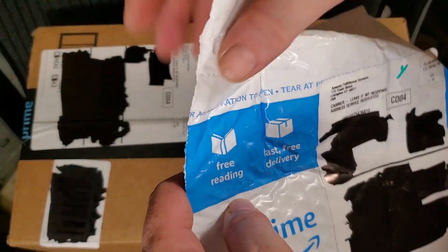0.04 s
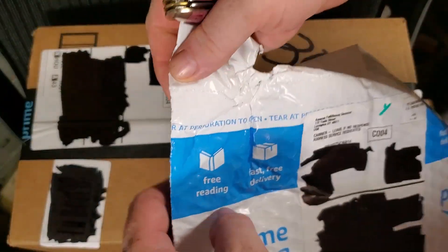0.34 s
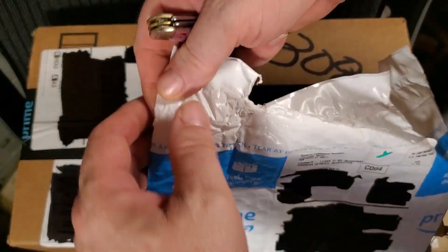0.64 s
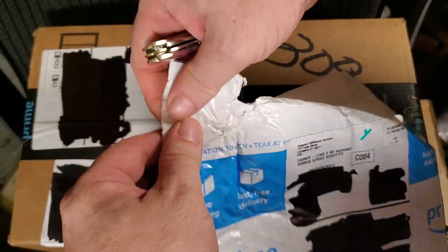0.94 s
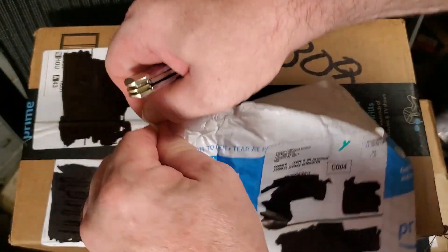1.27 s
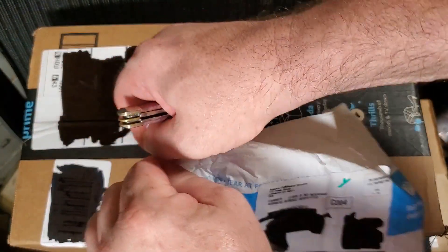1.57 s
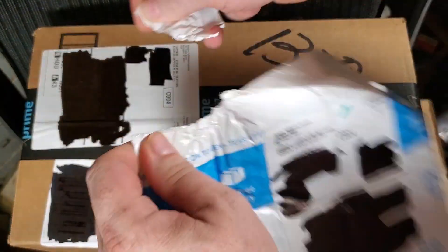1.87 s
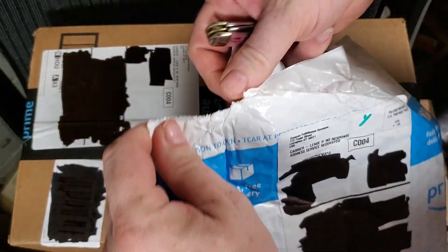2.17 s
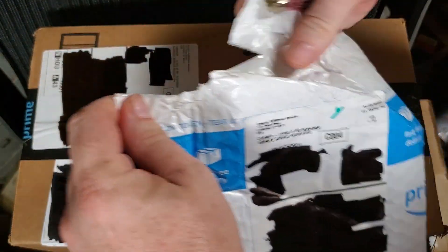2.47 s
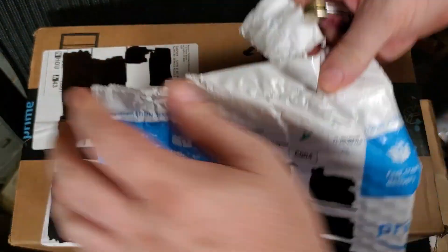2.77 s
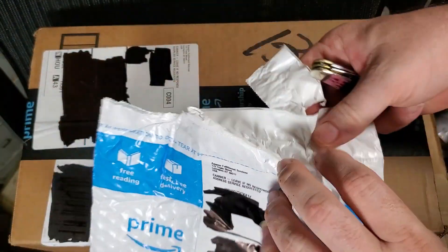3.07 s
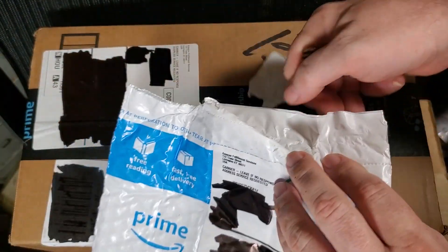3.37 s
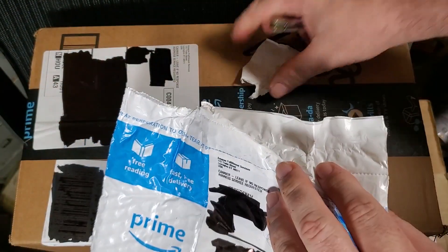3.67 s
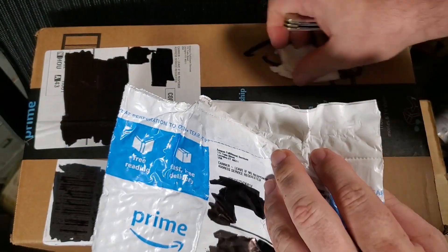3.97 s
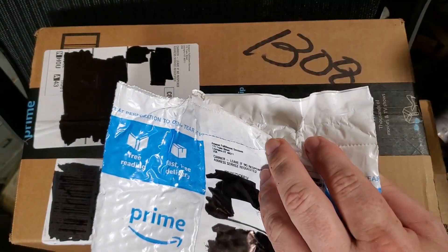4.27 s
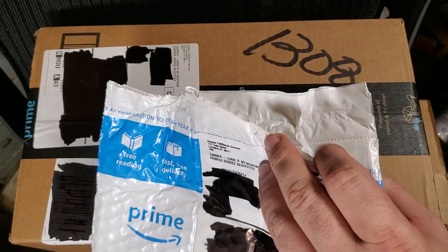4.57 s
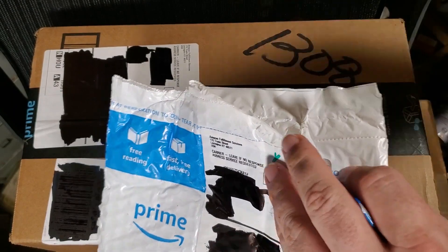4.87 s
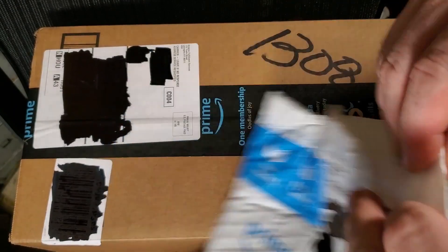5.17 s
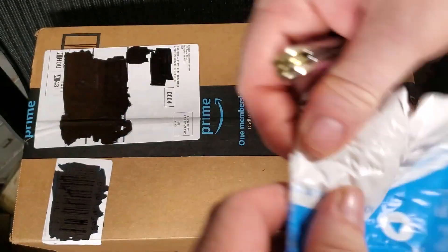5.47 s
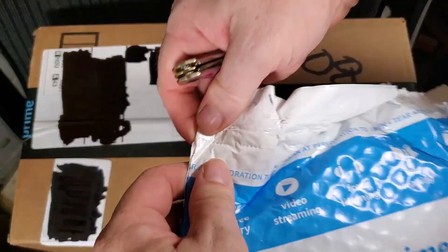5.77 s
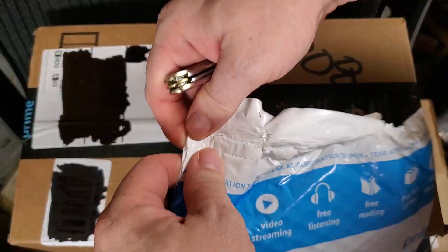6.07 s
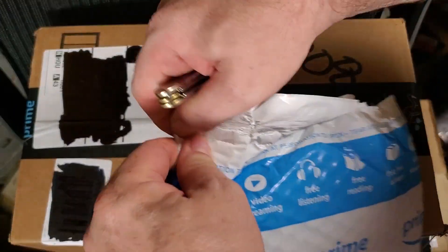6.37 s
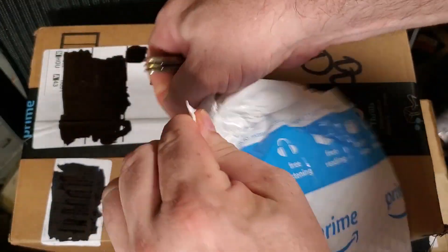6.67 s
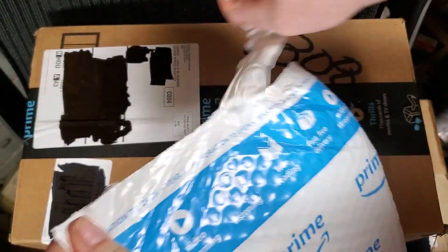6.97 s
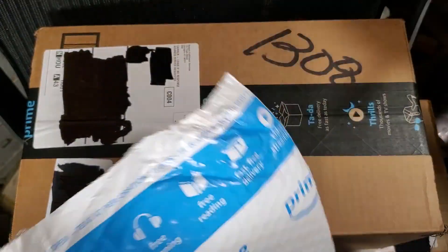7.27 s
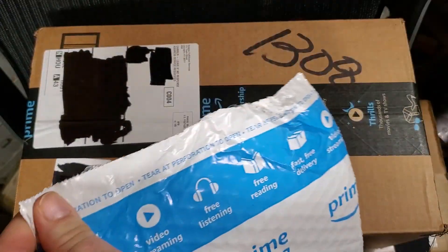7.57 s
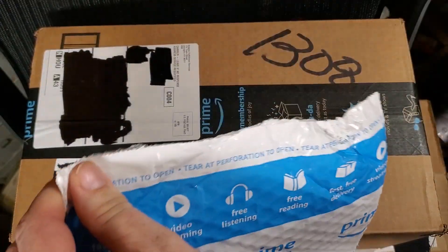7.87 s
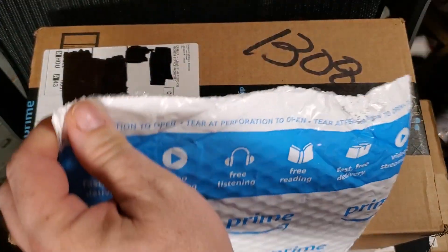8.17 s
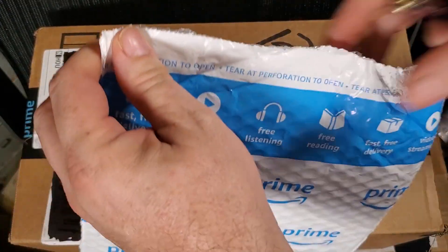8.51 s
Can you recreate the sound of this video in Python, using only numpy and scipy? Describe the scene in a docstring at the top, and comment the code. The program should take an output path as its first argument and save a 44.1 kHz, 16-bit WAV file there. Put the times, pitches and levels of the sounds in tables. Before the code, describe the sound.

Hands work a plastic bubble mailer, crinkling it with sharp little snaps, then rip the sealed strip with a loud pop. Lighter rustling follows, with soft taps and knocks on a cardboard box and a brief lull. The mailer scrapes across the box, crackles again and is torn in a quick run of loud, zipping rips before the rustle thins out. The microphone is very close, in a small, quiet room.

```python
"""Plastic film crinkles close to the microphone, a phone just above a cardboard box in a small room. Hands grip
a bubble mailer, rip its sealed strip once, lay it down, slide it round and tear twice more along the other
side. Creases snap over, the seal pops and zips, and the taut pouch drums under each rip. Hands and scraps knock
and tap on the box."""
import sys
import numpy as np
from scipy import signal
from scipy.fft import rfft, irfft, next_fast_len
from scipy.io import wavfile
from scipy.ndimage import uniform_filter1d

SR = 44100
rng = np.random.default_rng(int(sys.argv[2]) if len(sys.argv) > 2 else 0)


def generate_wav(sig):
    """Save sig (samples, or channels by samples) to the path in sys.argv[1] as 16-bit PCM at SR."""
    pcm = np.round(np.clip(np.atleast_2d(sig).T, -1, 1) * 32767).astype(np.int16)
    wavfile.write(sys.argv[1], SR, pcm)


N = 376613
BAND_LIMIT_HZ = 10700
GRIP_ATTACK_S, GRIP_FALL_DB_PER_S = 0.038, 183
SLACKEN_DB_PER_S = 311  # the pouch goes slack once a pull ends

# Levels in all tables are relative, ahead of each layer's gain.
# hands flexing the mailer: t/s, length/s, crinkle level/dB, padding level/dB
GRIPS = [(0, 0.08, -57, -45.5), (0.103, 0.76, -48.5, -46.5), (0.965, 0.42, -33.5, -42),
         (1.4, 0.5, -46.5, -55), (1.736, 0.03, -29, -34), (1.874, 0.25, -39.5, -49),
         (2.217, 0.34, -39, -48), (2.543, 0.31, -41, -49), (2.86, 0.62, -48.5, -72), (3.24, 0.29, -58, -60),
         (3.677, 0.18, -38, -37.5), (3.891, 0.17, -38, -43), (4.138, 0.12, -55, -60.5),
         (4.712, 0.18, -46, -46.5), (5.402, 0.12, -26.5, -31.5), (5.675, 0.11, -50, -43.5),
         (5.818, 0.46, -44, -46), (6.363, 0.094, -31, -37), (7.115, 0.35, -46.5, -48.5),
         (7.404, 0.53, -55, -80), (8.294, 0.22, -46.5, -49.5)]
# spectrum of crinkling film: f/Hz, level/dB
FILM_SPECTRUM = [(240, -21), (400, -15.5), (560, 9.5), (780, 2), (1040, -0.5), (1470, -6), (1950, -4.5),
                 (4950, -2.5), (6600, 0.5), (9410, -2.5), (10500, -32.5), (13600, -64.5), (22000, -120)]
# mailer or hand sliding on the box: t/s, length/s, level/dB, hollow f/Hz, full-speed scrape f/Hz
SLIDES = [(3.716, 0.032, -35, 1310, 2450), (3.912, 0.077, -49, 1320, 1520), (4.925, 0.17, -44, 1124, 1220),
          (5.054, 0.25, -28.5, 1280, 2200), (7.251, 0.13, -44, 870, 1920), (8.0, 0.19, -57.5, 1320, 2860),
          (8.21, 0.21, -58, 1360, 3100)]
# pulls that run the tear on: t/s, length/s, attack/s, tear fall/(dB/s), tear level/dB, drum level/dB,
# pushed air level/dB, throat level/dB, throat start f/Hz, throat end f/Hz
PULLS = [(1.61, 0.065, 0.008, 153, -17, -28, -34, -26.5, 380, 275),
         (6.587, 0.095, 0.024, 155, -16.5, -24, -48, -29.5, 330, 320),
         (6.716, 0.12, 0.0098, 189, -16, -28, -31.5, -23.5, 200, 460),
         (6.973, 0.069, 0.082, 293, -12.5, -19.5, -32, -23, 340, 518)]


def gain_of(db):
    """Decibels to amplitude."""
    return 10 ** (np.asarray(db) / 20)


def unit_rms(x):
    """Scales to rms 1."""
    return x / np.sqrt(np.mean(x ** 2) + 1e-20)


def steady(x, size=1500):
    """Evens out the power over about size samples and keeps the fine grain."""
    return x / np.sqrt(abs(uniform_filter1d(uniform_filter1d(x ** 2, size), size)) + 1e-9)


def smooth_noise(size):
    """Noise averaged over size samples, at rms 1."""
    return unit_rms(uniform_filter1d(rng.standard_normal(N), size))


def curve_at(points, hz):
    """Reads a table on a log-frequency axis."""
    f, value = np.transpose(points)
    return np.interp(np.log(hz + 1), np.log(f + 1), value)


def add(mix, s, sound):
    """Adds a sound into the mix at time s."""
    part = mix[max(round(s * SR), 0):][:len(sound)]
    part += sound[:len(part)]


def envelope(moves, attack_s, fall_db_per_s, swell_db=0):
    """Gain of movements (t/s, length/s, level/dB): each rises, holds or swells, then dies away."""
    gain, t = np.zeros(N), np.arange(int(1.5 * SR)) / SR
    for start, length, db in moves:
        held_db = db + swell_db * (np.minimum(t / length, 1) - .5)
        fallen_db = fall_db_per_s * np.maximum(t - length, 0)
        add(gain, start, np.minimum(t / attack_s, 1) * gain_of(held_db - fallen_db))
    return gain


def colour(x, spectrum, size=4096):
    """Minimum-phase filter of unit energy: clicks keep their sharp front."""
    log_gain = np.log(gain_of(curve_at(spectrum, abs(np.fft.fftfreq(size, 1 / SR))).clip(-100)))
    impulse = np.fft.ifft(np.exp(np.conj(signal.hilbert(log_gain)))).real[:size // 2]
    return signal.oaconvolve(x, impulse / np.linalg.norm(impulse))[:len(x)]


def resonate(x, hz, width_hz):
    """A resonance that can glide, at rms 1: twice shifts hz down to zero, smooths and shifts back."""
    turn = np.exp(2j * np.pi * np.cumsum(np.broadcast_to(hz, len(x))) / SR)
    pole = np.exp(-np.pi * width_hz / SR)
    for _ in range(2):
        x = 2 * (turn * signal.lfilter([1 - pole], [1, -pole], x / turn)).real
    return unit_rms(x)


def hump(x, hz, octaves):
    """The broad resonance of a patch of film."""
    f = np.fft.rfftfreq(len(x), 1 / SR)
    return irfft(rfft(x) * (f < BAND_LIMIT_HZ) / (1 + (np.log2((f + 1) / hz) / octaves) ** 2), len(x))


def crackle(per_s, spread_db):
    """Random clicks of either sign and uneven size."""
    size = gain_of(spread_db * np.minimum(rng.exponential(1, N), 2.47))
    return size * rng.choice([-1, 1], N) * (rng.random(N) < per_s / SR)


def facet(hz, decay_s, octaves, flap_db=-3, size=1024):
    """One facet of film flips: a brief flutter with a narrow resonance of its own; energy 1."""
    flutter = np.roll(rng.standard_normal(size) * np.exp(-np.arange(size) / SR / decay_s), 16)
    flap_hz = min(hz * 2 ** rng.uniform(-.8, .6), 9000)
    flip = hump(flutter, hz, octaves) + gain_of(flap_db) * hump(flutter, flap_hz, octaves=.22)
    return flip / np.linalg.norm(flip)


def facets(clicks, low_hz, high_hz, decay_s, octaves, count=32):
    """Every click flips one of many facets of different size."""
    shapes = [facet(hz, decay_s, octaves) for hz in np.geomspace(low_hz, high_hz, count)]
    out, which = np.zeros(N), rng.integers(0, count, N)
    for at in np.flatnonzero(clicks):
        add(out, at / SR, clicks[at] * shapes[which[at]])
    return out


def flexing():
    """How hard the fingers work the film."""
    return envelope([row[:3] for row in GRIPS], GRIP_ATTACK_S, GRIP_FALL_DB_PER_S)


def sliding():
    """How hard the mailer rubs on the box."""
    return envelope([row[:3] for row in SLIDES], attack_s=0.03, fall_db_per_s=144)


def room_tone(level_db=-48.5):
    """The small room's steady low rumble and faint hiss."""
    # spectrum of the quiet room: f/Hz, level/dB
    spectrum = [(12, -30), (20, -11.5), (49, -7), (70, -3.5), (87, -8), (129, -7), (147, -14.5),
                (290, -17.5), (322, -11), (376, -27), (619, -22.5), (706, -31.5), (7870, -50.5),
                (9710, -45.5), (10500, -77.5), (13600, -109), (22000, -120)]
    return gain_of(level_db) * unit_rms(colour(rng.standard_normal(N), spectrum))


def echoes(x, near_db=-5, near_t60=0.019, tail_db=-8):
    """Quick reflections from the nearby hands and box, then the short ring of the room."""
    # reverberation time of the room: f/Hz, t60/s
    room_t60 = [(100, 0.18), (500, 0.13), (2000, 0.09), (5000, 0.098), (10000, 0.14)]
    t = np.arange(SR // 2) / SR
    near, far = rng.choice([-1., 1.], (2, len(t))) * (rng.random((2, len(t))) < 3000 / SR)
    near *= gain_of(-60 * t / near_t60) * (t > .0012)
    hz, frame_s, bands = signal.stft(far * (t > .007), SR, nperseg=256)
    bands = bands * gain_of(-60 * frame_s / curve_at(room_t60, hz)[:, None])
    tail = signal.istft(bands, SR, nperseg=256)[1][:len(t)]
    impulse = gain_of(near_db) * near / np.linalg.norm(near)
    impulse += gain_of(tail_db) * tail / np.linalg.norm(tail)
    return signal.fftconvolve(x, impulse)[:N]


def room(x, turns_per_s=2.6):
    """Direct sound plus two crossfading patterns of reflections, as the mailer keeps moving."""
    angle = 2 * np.pi * turns_per_s * np.arange(N) / SR
    return x + echoes(x * np.cos(angle)) + echoes(x * np.sin(angle))


def side_echoes(x):
    """Reflections that differ between the phone's two microphones, mostly in the treble."""
    # gain of the reflections in the side channel: f/Hz, level/dB
    width = [(100, -60), (2700, -58), (4000, -30), (5500, -18), (7000, -10), (10000, -8)]
    size = next_fast_len(N)
    gain = gain_of(curve_at(width, np.fft.rfftfreq(size, 1 / SR)))
    return irfft(rfft(echoes(x), size) * gain, size)[:N]


def taps():
    """Fingertips tap the box as they put the scrap down; it answers with a short hollow thud."""
    # fingertip contacts: t/s, level/dB, contact/s (long is dull)
    touches = [(3.289, -24, 0.0056), (3.323, -27, .0018), (3.395, -22, 0.0011), (3.481, -24.5, .002)]
    # modes of the cardboard: f/Hz, level/dB, t60/s
    box_modes = [(112, -9, .06), (312, 0, .036), (450, -4, .022), (750, -8, .04), (1200, -9, .025)]
    out, t = np.zeros(N), np.arange(SR // 6) / SR
    box = sum(gain_of(db - 60 * t / t60) * np.sin(2 * np.pi * hz * t) for hz, db, t60 in box_modes)
    for s, db, contact in touches:
        thud = np.convolve(box, np.sin(np.pi * t[t < contact] / contact) ** 2)
        add(out, s, gain_of(db) * thud / abs(thud).max())
    return out


def knocks(knock_db=-3, bass_below_hz=140, rise_s=0.000076, scatter=0.048):
    """Hands and pouch bump the box, each time on another spot, so its damped modes vary a little."""
    # dull blows: t/s, level/dB, bass boost/dB, pitch ratio
    blows = [(0.14, -61, 26, 0.93), (0.228, -34, -5, 0.98), (1.342, -56, 23.5, 0.87), (1.613, -27, 1, 1.14),
             (1.659, -20, -0.5, 0.7), (1.717, -18.5, -7, 1.05), (1.777, -28, -6, 1.1),
             (1.918, -33, 0.5, 0.93), (2.487, -28.5, -16, 0.92), (2.575, -32.5, -4.5, 1.08),
             (2.754, -42, 5.5, 1), (3.715, -32.5, -3, 1.1), (3.75, -24.5, -9, 0.99), (3.821, -23.5, -8, 1),
             (4.08, -31, -13, 0.975), (5.963, -31, 3, 0.62), (6.393, -42, 2, 0.88), (6.759, -23, -14, 0.78),
             (7.036, -28, 4, 1.4), (7.104, -34.5, 7, 1.18), (8.461, -36, 6, 0.93)]
    # modes that a blow rings: f/Hz, level/dB, t60/s
    knock_modes = [(62.6, 4, 0.19), (95, 10.5, 0.084), (120, -4, 0.18), (164.5, -7, 0.041),
                   (213.3, -12, 0.093), (315, 5.5, 0.066), (452, -1.5, 0.072), (604, 3, 0.036),
                   (827, -7, 0.1), (1030, -1, 0.05)]
    out, t = np.zeros(N), np.arange(SR // 4) / SR
    hz, mode_db, t60 = np.transpose(knock_modes)[:, :, None]
    for s, db, bass_db, pitch in blows:
        detune, phase = rng.standard_normal((2, len(hz), 1))
        decay = gain_of(mode_db + bass_db * (hz < bass_below_hz) - 60 * t / t60)
        modes = decay * np.sin(2 * np.pi * (hz * pitch * (1 + scatter * detune) * t + phase))
        add(out, s, gain_of(db + knock_db) * modes.sum(0) * (1 - np.exp(-t / rise_s)))
    return out


def pouch(padding_db=-3, waft_db=-2, sliding_db=-15, waft_lead_s=0.032, waft_s=0.097):
    """The padding bumps softly when gripped or slid; the pouch wafts air as each pull jerks it free."""
    # spectrum of the bubble padding: f/Hz, level/dB
    padding_spectrum = [(29, -40.5), (50, 3), (123, -2), (175, -3.5), (326, -3), (367, -14.5), (420, -3),
                        (668, -13), (1200, -33), (1560, -41), (2640, -120)]
    air_spectrum = [(15, -27.0), (40, 14.0), (80, 3.5), (160, -18.5), (500, -77.0)]
    bumps = unit_rms(steady(colour(crackle(per_s=740, spread_db=0.5), padding_spectrum), size=3000))
    air = unit_rms(steady(colour(rng.standard_normal(N), air_spectrum)))
    grips = [(s, length, db) for s, length, _, db in GRIPS]
    handling = envelope(grips, GRIP_ATTACK_S, GRIP_FALL_DB_PER_S) + gain_of(sliding_db) * sliding()
    wafts = [(s + length - waft_lead_s, waft_s, db) for s, length, _, _, _, _, db, *_ in PULLS]
    swing = envelope(wafts, attack_s=0.013, fall_db_per_s=270)
    return gain_of(padding_db) * handling * bumps + gain_of(waft_db) * swing * air


def finger_drag(drag_db=-1):
    """Skin sticks and slips on the film and sets the air in the pouch booming."""
    # fingers taking hold: t/s, length/s, level/dB
    drags = [(5.49, 0.019, -29), (5.542, 0.028, -31.5), (5.618, 0.015, -36)]
    boom = resonate(crackle(per_s=680, spread_db=4.5), hz=205, width_hz=190)
    pressure = envelope(drags, attack_s=0.0085, fall_db_per_s=332)
    return gain_of(drag_db) * pressure * unit_rms(steady(boom, size=900))


def brief_rings():
    """A brief bright ring as the scrap is put down, probably a knife touching;
    hollow notes as the mailer is grasped or lifted."""
    # narrow resonances: t/s, length/s, level/dB, f/Hz, width/Hz
    rings = [(3.8, 0.018, -30, 4470, 500), (5.42, 0.014, -36, 474, 160), (8.138, .36, -65, 1380, 110)]
    out = np.zeros(N)
    for start, length, db, hz, width_hz in rings:
        note = resonate(rng.standard_normal(N), hz, width_hz)
        out += envelope([(start, length, db)], attack_s=0.01, fall_db_per_s=260) * note
    return out


def slides(grit_db=-3, hollow_db=-11, scrape_db=-5, catch_db=1.5, fastest_share=0.76):
    """Film catches and slips on cardboard: gritty hiss, a hollow note, a scrape that rises with speed."""
    # spectrum of film rubbing cardboard: f/Hz, level/dB
    hiss_spectrum = [(300, -12), (600, -11.5), (850, -10.5), (1100, -4), (1500, -6.5), (2400, -9),
                     (3200, -7.5), (4500, -9), (7000, -12), (9700, -19.5), (10300, -43)]
    grit = unit_rms(crackle(per_s=900, spread_db=3))
    rub = rng.standard_normal(N) + gain_of(grit_db) * grit
    rub *= gain_of(catch_db * smooth_noise(500))
    t = np.arange(N) / SR
    hollow_hz = np.interp(t, [s + length / 2 for s, length, *_ in SLIDES], [row[3] for row in SLIDES])
    scrape_hz = hollow_hz.copy()
    for s, length, _, rest_hz, top_hz in SLIDES:
        speed = np.sin(np.pi / 2 * np.clip((t - s) / (fastest_share * length), 0, 2))
        scrape_hz += (top_hz - rest_hz) * speed
    hollow = gain_of(hollow_db) * resonate(rub, hollow_hz, width_hz=480)
    scrape = gain_of(scrape_db) * resonate(rub, scrape_hz, width_hz=900)
    return sliding() * (unit_rms(colour(rub, hiss_spectrum)) + hollow + scrape)


def crinkle(crinkle_db=-1, hiss_db=-13, clump_db=3):
    """Small creases give way in clumps, over the hiss of skin and film rubbing."""
    clicks = crackle(per_s=900, spread_db=1.0)
    grains = facets(clicks, low_hz=1360, high_hz=8700, decay_s=0.0011, octaves=0.57, count=40)
    film = colour(steady(grains, size=3000) + gain_of(hiss_db) * rng.standard_normal(N), FILM_SPECTRUM)
    clumps = gain_of(clump_db * unit_rms(uniform_filter1d(smooth_noise(600), 200)))
    return gain_of(crinkle_db) * flexing() * unit_rms(film * clumps)


def scrunches(scrunch_db=-3):
    """A squeeze folds many creases at once: a brief swell of dense crackle."""
    # changes of grip: middle t/s, level/dB, half length/s, centre f/Hz
    squeezes = [(0.346, -33.5, 0.032, 3780), (0.797, -38, 0.15, 5000), (0.966, -37, 0.02, 6450),
                (1.235, -28.5, 0.066, 6500), (1.367, -35, 0.024, 5000), (1.546, -32.5, 0.05, 5400),
                (1.736, -19.5, 0.027, 4500), (2.534, -38, 0.056, 1800), (2.584, -34, 0.025, 4500),
                (2.788, -31.5, 0.018, 6000), (3.129, -37.5, 0.058, 4230), (3.284, -31.5, 0.084, 5460),
                (3.816, -20.5, 0.023, 4800), (4.065, -30, 0.081, 4190), (4.528, -52.5, 0.059, 4970),
                (4.811, -34.5, 0.041, 3980), (5.195, -22, 0.11, 5000), (5.394, -25.5, 0.041, 5200),
                (5.465, -19.5, 0.05, 4500), (5.707, -28.5, 0.088, 3700), (6.081, -26, 0.037, 5170),
                (6.417, -26.5, 0.01, 5000), (6.501, -27.5, 0.026, 4940), (6.99, -22, 0.053, 5560),
                (7.129, -27, 0.058, 5000), (7.63, -44.5, 0.076, 4800), (7.873, -40.5, 0.035, 5900)]
    clicks = crackle(per_s=1300, spread_db=6.0)
    grains = facets(clicks, low_hz=1470, high_hz=9150, decay_s=0.001, octaves=0.92)
    film = colour(steady(grains, size=700), FILM_SPECTRUM)
    out = np.zeros(N)
    for s, db, half_s, hz in squeezes:
        part = film[max(round((s - half_s) * SR), 0):round((s + half_s) * SR)]
        swell = unit_rms(hump(part, hz, octaves=2.76)) * np.hanning(len(part))
        add(out, s - half_s, gain_of(db + scrunch_db) * swell)
    return out


def small_creases(per_s=20, spread_db=0.5, centre_hz=3900, octaves=0.7, decay_s=0.0016, ring_db=-6):
    """Rows for snaps(): lesser creases go at random, louder the harder the film is flexed."""
    at = np.flatnonzero(rng.random(N) < per_s / SR)
    softness, pitch = rng.standard_normal((2, N))[:, at]
    levels_db = 20 * np.log10(flexing()[at] + 1e-9) - spread_db * softness
    pitches_hz = np.minimum(centre_hz * 2 ** (octaves * pitch), BAND_LIMIT_HZ)
    return [(s, db, hz, decay_s, hz, ring_db) for s, db, hz in zip(at / SR, levels_db, pitches_hz)]


def snaps(snap_db=14.5, ring_s=0.0011, avalanche_db=-8, avalanche_s=0.0068, avalanche_per_s=900):
    """A crease snaps over, rings its patch of film and sets off a short avalanche of smaller ones."""
    # large creases: t/s, level/dB, centre f/Hz, decay/s, ring f/Hz, ring level/dB against the crack
    large_creases = [(0.104, -29.5, 3460, 0.0023, 3300, -14), (0.144, -22.5, 6000, 0.0056, 5080, -15),
                     (0.221, -26, 4400, 0.0015, 5300, 4), (0.228, -21.5, 4450, 0.00095, 3350, -3),
                     (0.267, -22.5, 5360, 0.0011, 3270, -15), (0.311, -23.5, 4170, 0.0042, 3420, -9),
                     (0.403, -31, 6430, 0.0014, 9170, -7), (0.418, -27.5, 4500, 0.002, 4600, -4),
                     (0.486, -34, 5500, 0.0047, 9110, -8), (0.543, -26.5, 4870, 0.0031, 4800, 1),
                     (0.56, -26, 4270, 0.0016, 4070, -11), (0.674, -28.5, 5300, 0.0033, 5620, -14),
                     (0.788, -22, 3960, 0.0025, 3400, -9), (0.926, -26, 5400, 0.0015, 5960, 1),
                     (0.935, -20.5, 5360, 0.0023, 5350, 2), (0.951, -19, 5350, 0.0013, 3000, -8),
                     (0.992, -25, 6500, 0.0015, 7690, -7), (1.014, -19, 4370, 0.0009, 6260, -5),
                     (1.066, -20, 4500, 0.00097, 7400, -3), (1.086, -20, 4830, 0.0016, 4220, -9),
                     (1.094, -28, 4200, 0.0022, 5510, -5), (1.213, -20.5, 3380, 0.0046, 2970, 0),
                     (1.271, -17.5, 4800, 0.0004, 6760, -7), (1.315, -44, 5500, 0.0015, 2020, -2),
                     (1.351, -13.5, 3050, 0.002, 3000, -4.5), (1.411, -34, 5500, 0.0017, 6960, -7),
                     (1.444, -21.5, 3680, 0.003, 4480, -3), (1.505, -33, 5500, 0.0015, 4330, -6),
                     (1.518, -23.5, 4060, 0.0012, 3530, -9), (1.591, -28, 4500, 0.0017, 4350, -5),
                     (1.631, -5.5, 3770, 0.00067, 3500, -3), (1.65, -11, 4500, 0.0005, 2220, -12),
                     (1.864, -27, 4500, 0.0035, 3880, -7), (1.963, -34.5, 5130, 0.0033, 4410, -6),
                     (2.05, -26.5, 5000, 0.002, 3700, -9), (2.06, -25, 5200, 0.0017, 5900, -4),
                     (2.075, -28, 4100, 0.0027, 2900, 3), (2.106, -30, 3300, 0.0013, 2170, -8),
                     (2.144, -25.0, 3930, 0.003, 2840, -12), (2.204, -23.5, 5900, 0.0035, 6740, -1),
                     (2.363, -31, 5000, 0.00048, 4800, -2), (2.443, -28, 5000, 0.001, 5800, 0),
                     (2.488, -28, 2700, 0.0031, 2010, 1), (2.522, -21.0, 2620, 0.001, 2900, 9),
                     (2.568, -17.5, 4530, 0.0043, 7490, -6), (2.668, -38, 5000, 0.001, 5250, -6),
                     (2.686, -24.5, 5600, 0.0022, 5620, -4), (2.711, -23.5, 5770, 0.0028, 6740, -2),
                     (2.756, -19.5, 6550, 0.0022, 8300, -11), (2.819, -26.5, 5800, 0.0019, 6550, -3),
                     (2.838, -40, 4630, 0.0017, 3250, -9), (3.005, -29.5, 6800, 0.0029, 6150, 6),
                     (3.065, -28, 6250, 0.0055, 6270, -5), (3.104, -27.5, 3600, 0.002, 3080, -4),
                     (3.271, -20, 5200, 0.002, 3870, -5), (3.447, -25, 5560, 0.00053, 4780, -11),
                     (3.634, -29, 4960, 0.0017, 4100, -3), (3.707, -23.5, 2720, 0.0026, 2170, -12),
                     (3.754, -21.5, 5500, 0.0017, 6840, -3), (3.812, -26, 4500, 0.0032, 4230, -2),
                     (3.821, -7, 5000, 0.0016, 4430, 1.5), (4.061, -16.0, 3600, 0.0007, 3140, -13),
                     (4.066, -11.5, 4400, 0.0008, 3360, -2.5), (4.241, -32.5, 5800, 0.0017, 6640, -2.5),
                     (4.359, -38.0, 4670, 0.0014, 4630, -2.5), (5.485, -21.5, 6080, 0.0015, 4930, -9),
                     (5.516, -18, 3800, 0.0023, 4800, 4), (5.533, -15.5, 4000, 0.0015, 4300, -6),
                     (5.548, -17.0, 3050, 0.0037, 3020, -8), (5.576, -13, 5260, 0.00093, 6460, -2),
                     (5.621, -20, 3460, 0.0008, 2450, 1), (5.647, -18.5, 4950, 0.0012, 3950, -12),
                     (5.669, -15.5, 3180, 0.00043, 3800, -10), (5.678, -20.5, 4070, 0.0022, 5100, -11),
                     (5.693, -20, 3480, 0.00079, 3880, -14), (5.723, -15, 3720, 0.0016, 2760, -2.5),
                     (5.783, -23, 3400, 0.00084, 1670, -7), (5.819, -31, 3500, 0.0009, 3960, 5),
                     (5.868, -21.5, 6800, 0.0009, 6350, 1), (5.929, -27, 3400, 0.0024, 3440, 3),
                     (5.965, -29, 1860, 0.0011, 4200, -8), (5.994, -18, 3600, 0.0017, 3510, -7),
                     (6.01, -34, 5000, 0.0007, 5680, -5), (6.035, -17, 7000, 0.0025, 2230, -7),
                     (6.061, -13, 6200, 0.0016, 7690, -5), (6.079, -25, 4300, 0.00088, 2000, 2),
                     (6.137, -26, 6500, 0.0022, 2050, -7), (6.159, -20.5, 6530, 0.0003, 5580, -4),
                     (6.334, -21.5, 5600, 0.0036, 4540, -12), (6.354, -31, 6000, 0.0013, 6030, 1),
                     (6.367, -18.5, 4800, 0.0014, 6100, -1), (6.395, -20.5, 5130, 0.0008, 6550, 2),
                     (6.431, -28, 6540, 0.0024, 7320, 8), (6.455, -16.5, 6750, 0.0012, 5830, -19),
                     (6.478, -15, 4260, 0.0029, 8150, -21), (6.521, -15, 4880, 0.0018, 6930, -7),
                     (6.54, -21, 4760, 0.0015, 6750, -11), (6.579, -10.5, 3700, 0.0012, 2980, -2),
                     (6.72, -8.5, 3500, 0.0028, 7320, -9), (6.939, -19.0, 5540, 0.0015, 6350, -6),
                     (7.182, -26, 5500, 0.0017, 6300, -1), (7.218, -21.5, 5300, 0.0071, 4300, -15),
                     (7.422, -21, 8000, 0.001, 8900, -7), (7.447, -26.5, 5470, 0.0011, 4840, -3),
                     (7.53, -29.5, 4500, 0.0012, 4180, 0), (7.616, -26, 4670, 0.0027, 4050, -11),
                     (7.698, -30.5, 3960, 0.0021, 4330, -7), (7.801, -34.5, 5530, 0.0015, 6760, -2),
                     (7.877, -31, 6040, 0.0066, 7040, 3), (7.946, -35.5, 6240, 0.0029, 4480, -3),
                     (8.19, -31.5, 6300, 0.0013, 6360, -5), (8.465, -21, 5060, 0.0021, 5710, 7)]
    # colour shared by all snaps: f/Hz, level/dB
    spectrum = [(100, -25.5), (320, 10.5), (650, 6), (1100, 5.5), (2200, 2), (5000, 0), (8000, -0.5),
                (9700, 4.5), (10500, -12.5)]
    out, t = np.zeros(N), np.arange(SR // 20) / SR
    for s, db, hz, decay_s, ring_hz, ring_db in list(large_creases) + small_creases():
        clicks = rng.standard_normal(len(t)) * (rng.random(len(t)) < avalanche_per_s / SR)
        clicks *= (t > .002) * np.exp(-t / avalanche_s)
        clicks /= np.linalg.norm(clicks) + 1e-9
        ring = np.sin(2 * np.pi * ring_hz * t) * np.exp(-t / ring_s)
        size = gain_of(db + snap_db) / np.hypot(1, gain_of(ring_db))  # crack and ring share the energy
        add(out, s - .0004, size * facet(hz, decay_s, octaves=1.15, flap_db=-4.5))
        add(out, s, size * gain_of(ring_db) * ring / np.linalg.norm(ring))
        avalanche = signal.fftconvolve(clicks, facet(hz, decay_s=0.0037, octaves=2.1))
        add(out, s, gain_of(db + snap_db + avalanche_db) * avalanche)
    return colour(out, spectrum)


def pop(hz, crack_db, crack_boost_db=8, ring_s=0.0012, overtone_ratio=1.9, overtone_db=-3):
    """Stretched film parts: a crack, and a very short ring of the plucked pouch."""
    crack = facet(hz=3120, decay_s=0.0015, octaves=1.0)
    t = np.arange(len(crack)) / SR
    phase = 2 * np.pi * hz * t
    ring = np.sin(phase) + gain_of(overtone_db) * np.sin(phase * overtone_ratio)
    return gain_of(crack_db + crack_boost_db) * crack - ring * np.exp(-t / ring_s)


def seal_pops():
    """The strong spots of the seal break one by one."""
    # spots giving way: t/s, level/dB, ring f/Hz, crack level/dB
    spots = [(1.6158, -7, 336, -16), (1.655, -0.5, 500, -4), (1.662, 2.5, 1080, -2), (1.675, -5.5, 910, 1),
             (1.713, -5.5, 422, 8), (6.781, -4, 1900, -9), (7.075, -6.5, 515, -1), (7.1018, -0.5, 900, 0)]
    out = np.zeros(N)
    for s, db, hz, crack_db in spots:
        add(out, s, gain_of(db) * pop(hz, crack_db))
    return out


def zips(bridge_hz=353, spread_db=3.0, octaves=0.46, jitter=.06):
    """Evenly spaced bridges of the perforation break in a quick run of pops: the buzz of the rip."""
    # runs along the perforation: t/s, length/s, bridges/(1/s), level/dB
    runs = [(6.624, .055, 190, -35), (6.738, .112, 208, -12), (7.027, .045, 165, -11)]
    out = np.zeros(N)
    for start, length, per_s, db in runs:
        for s in np.arange(start, start + length, 1 / per_s):
            late, size, pitch = rng.standard_normal(3)
            bridge = pop(bridge_hz * 2 ** (octaves * pitch), crack_db=-9)
            add(out, s + jitter * late / per_s, gain_of(db + spread_db * size) * bridge)
    return out


def throat(plucks, throat_db=-1, rasp_db=-2, rasp_ratio=7.5):
    """Air in the pouch sounds through the opening, the stretched lip rasps above it; both glide."""
    out, t = np.zeros(N), np.arange(SR // 2) / SR
    for s, length, attack, *_, db, first_hz, last_hz in PULLS:
        hz = np.interp(t, [0, length], [first_hz, last_hz])
        drive = plucks[round(s * SR):][:len(t)]
        air = steady(resonate(drive, hz, width_hz=290))
        lip = steady(resonate(drive, hz * rasp_ratio, width_hz=900))
        fallen_db = SLACKEN_DB_PER_S * np.maximum(t - length, 0)
        gain = np.minimum(t / attack, 1) * gain_of(db + throat_db - fallen_db)
        add(out, s, gain * (air + gain_of(rasp_db) * lip))
    return out


def drumming(plucks, drum_db=-1, tauten_db=6):
    """The plucked pouch drums, louder as it tightens through each pull."""
    # response of the taut pouch: f/Hz, level/dB
    spectrum = [(35, -39), (60, -14), (232, 1.5), (386, 2.5), (524, 0), (684, -6), (764, -2), (951, -8.5),
                (1040, 4), (1100, -3), (1430, -37), (2420, -120)]
    tautness = sum(envelope([(s, length, db)], attack, SLACKEN_DB_PER_S, tauten_db)
                   for s, length, attack, _, _, db, *_ in PULLS)
    return gain_of(drum_db) * tautness * unit_rms(steady(colour(plucks, spectrum)))


def rips(tear_db=-1, edge_db=-10, slips_per_s=210, jitter=.4, spray_s=.002, between_slips=0.11):
    """The tear runs in uneven slips; each sprays micro-cracks, flicks the edge and plucks the pouch."""
    # spectrum of tearing film: f/Hz, level/dB
    spectrum = [(290, -32), (500, -2.5), (688, -16), (957, -8), (1030, -16), (1280, -6), (2110, -4.5),
                (4710, -3.5), (5140, -5), (7170, -0.5), (9360, -6), (9850, -9), (10500, -42.5),
                (13600, -80), (22000, -120)]
    slip_rate = slips_per_s * np.exp(jitter * smooth_noise(200))
    slips = np.diff(np.floor(np.cumsum(slip_rate) / SR), prepend=0)
    slips *= gain_of(3.1 * rng.standard_normal(N))
    spray = signal.lfilter([1], [1, -np.exp(-1 / (spray_s * SR))], slips)
    cracks = steady((between_slips + spray) * crackle(per_s=11000, spread_db=-9.5), size=700)
    edge = steady(facets(slips, low_hz=1240, high_hz=7330, decay_s=0.0045, octaves=0.19), size=700)
    tear = unit_rms(colour(cracks + gain_of(edge_db) * edge, spectrum))
    plucks = unit_rms(slips - slips.mean()) + 0.96 * unit_rms(cracks)
    pulling = np.max([envelope([(s, length, db)], attack, fall)
                      for s, length, attack, fall, db, *_ in PULLS], axis=0)
    return gain_of(tear_db) * pulling * tear + drumming(plucks) + throat(plucks)


def scene(hands_db=-2):
    """The handling sits close and dead centre over the room tone; only the treble spreads a little."""
    creasing = snaps() + crinkle() + scrunches()
    tearing = rips() + seal_pops() + zips()
    touching = slides() + brief_rings() + finger_drag()
    bumping = pouch() + knocks() + taps()
    hands = gain_of(hands_db) * (creasing + tearing + touching + bumping)
    mid = room(hands) + room_tone()
    side = side_echoes(hands)
    return np.array([mid + side, mid - side])


def record(dry):
    """The loudest peaks are flattened at a fixed ceiling; the phone cuts the top treble."""
    clipped = np.clip(dry, -.78, .78)
    lowpass = signal.firwin(301, BAND_LIMIT_HZ, window=("kaiser", 8), fs=SR)
    return signal.oaconvolve(clipped, lowpass[None], "same")


dry = scene()
out = record(dry)
generate_wav(out)
```